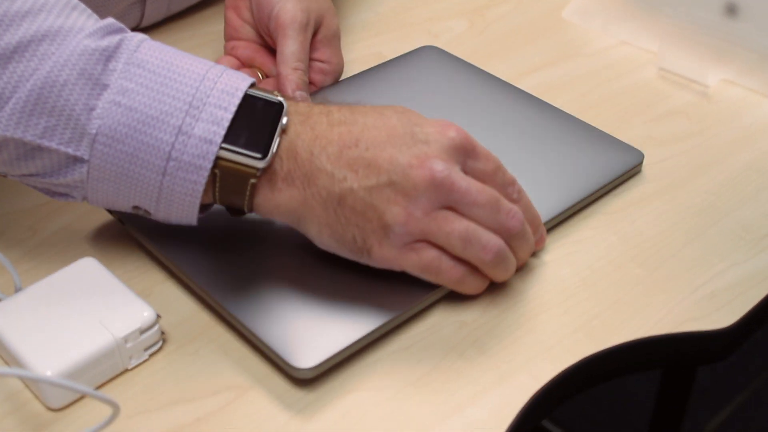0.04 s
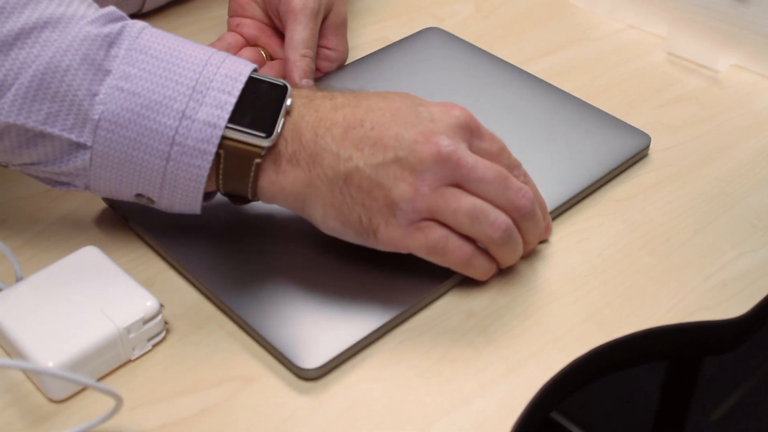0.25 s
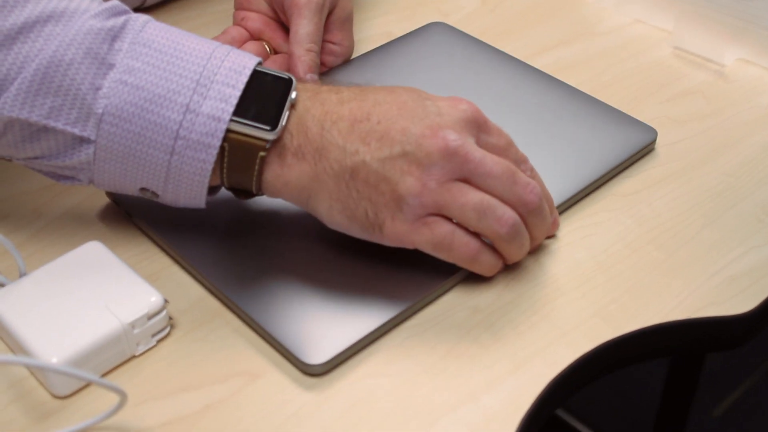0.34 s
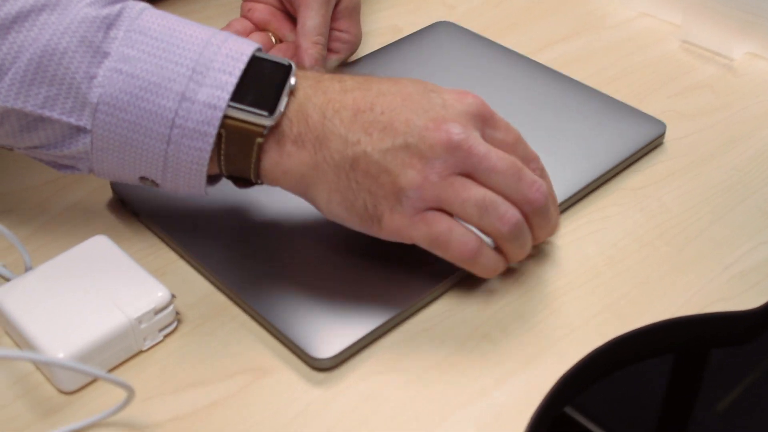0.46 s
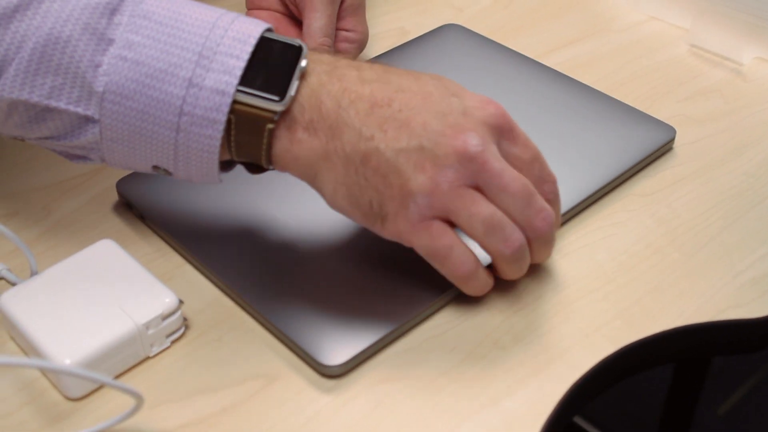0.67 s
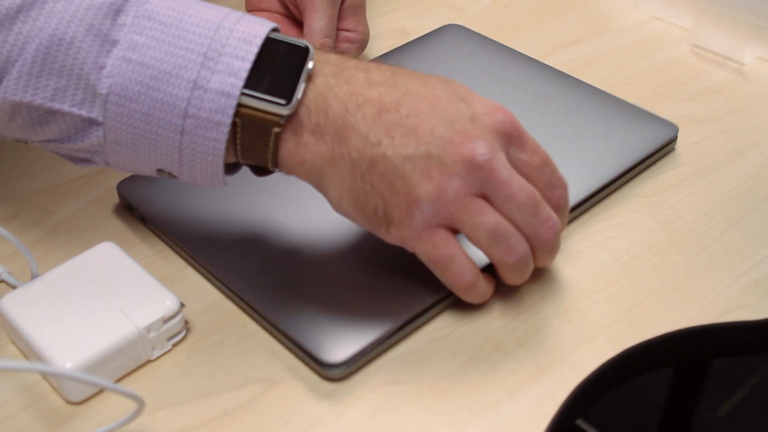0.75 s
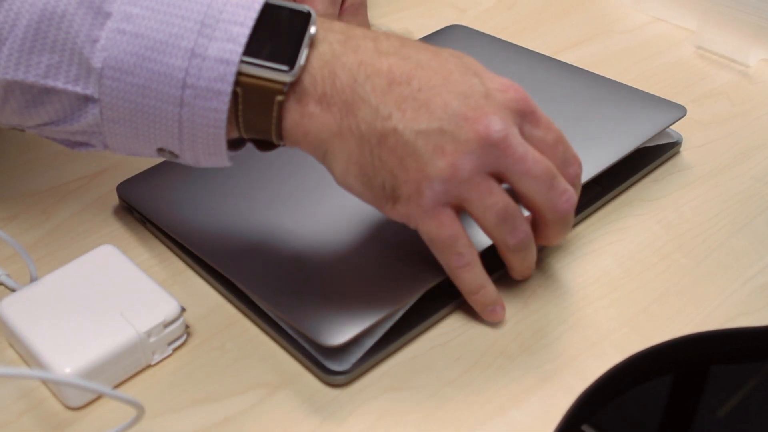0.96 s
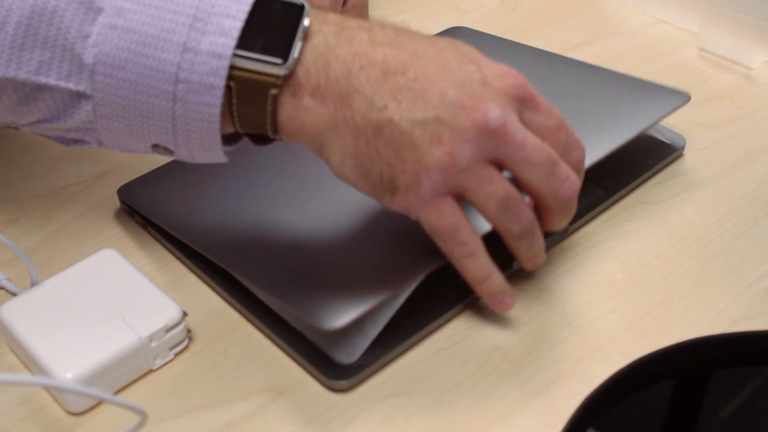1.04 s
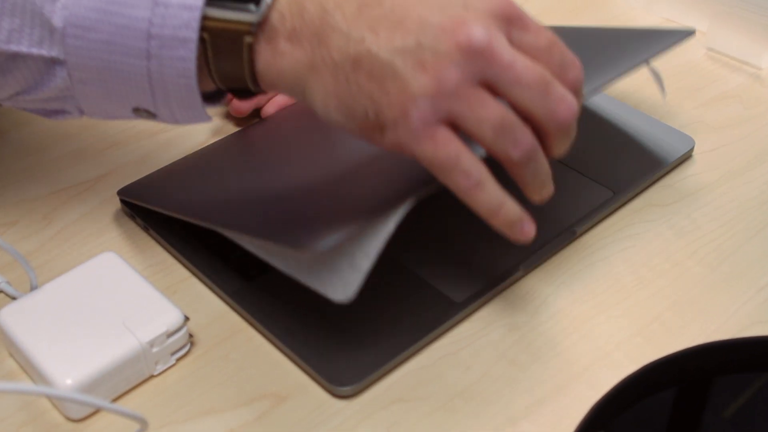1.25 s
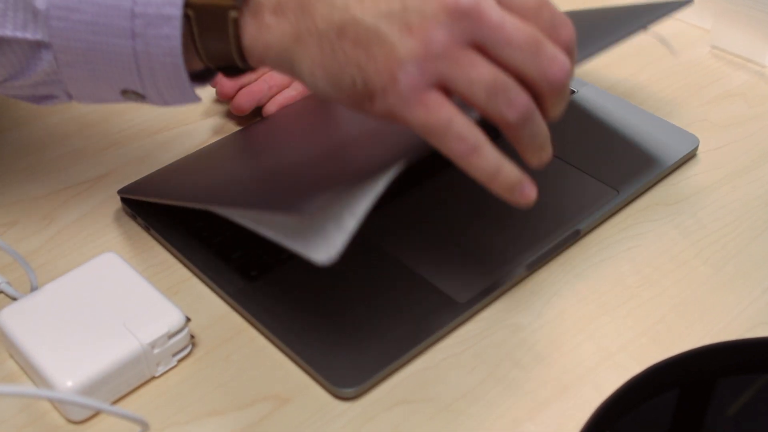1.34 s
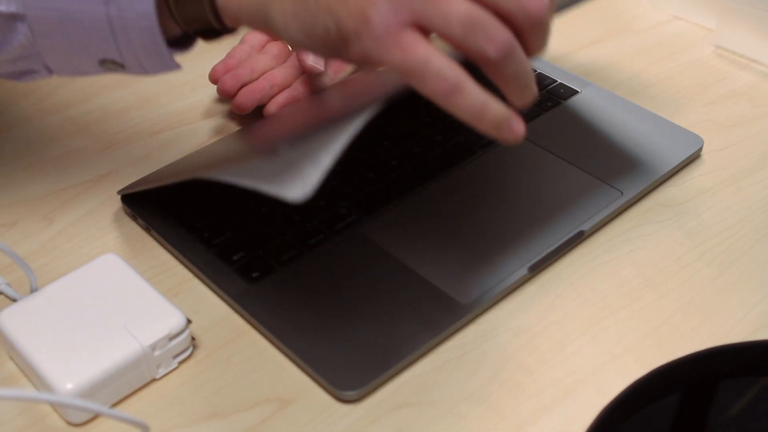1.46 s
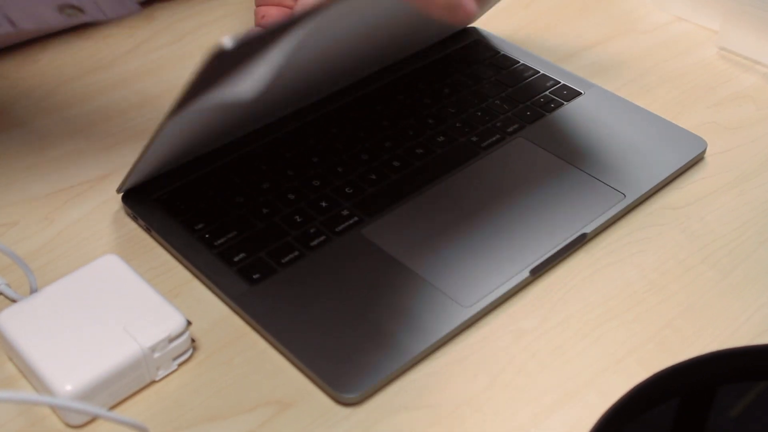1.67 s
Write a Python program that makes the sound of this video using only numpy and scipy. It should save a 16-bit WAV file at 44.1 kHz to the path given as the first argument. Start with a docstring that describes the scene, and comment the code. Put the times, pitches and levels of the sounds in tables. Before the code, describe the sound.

A metal laptop is handled on a wooden table: two finger knocks, a louder clap and thud as the lid slips shut, then a short fingernail scrape. It sounds close, in a small, quiet room with steady ventilation.

```python
"""A quiet, small room: a closed aluminium laptop is handled on a wooden table.
Fingers knock on its edge and ring the case; the lid slips and claps shut, and the table top booms.
A fingernail scrapes into the notch in tiny slips, then skin rubs faintly on the rising lid.
The contacts ring briefly in the room, over steady ventilation noise."""
import sys
import numpy as np
from scipy import signal
from scipy.fft import rfft, irfft
from scipy.io import wavfile

SR = 44100
rng = np.random.default_rng(int(sys.argv[2]) if len(sys.argv) > 2 else 0)


def put_to_file(sound):
    """Save the sound as 16-bit audio at rate SR, in the file named by the first command-line argument."""
    columns = np.atleast_2d(sound).T  # one column per channel
    safe = np.clip(columns, -1, 1)
    whole_steps = np.round(safe * 32767)
    wavfile.write(sys.argv[1], SR, whole_steps.astype(np.int16))


N = 74970
T = np.arange(N) / SR
RING_T = T[:int(.25 * SR)]


def lid():
    """Metal claps on metal, one corner first; the body thuds on the table and settles."""
    # Each row: start in seconds, gain in dB, contact low-pass in Hz.
    claps = [(0.4335, -3, 16800), (0.4378, -1.5, 3340), (0.4587, -14.5, 7860)]
    thuds = [(0.4348, -0.85, 4950), (0.4595, -11.5, 1780), (.541, -21, 347), (.572, -28, 398)]
    # Each row: frequency in Hz, spectral gain in dB.
    clap_colour = [(60, -23.5), (140, -13.5), (300, 0), (550, -7), (1100, -2.5), (1700, -10.5),
                   (2900, -7.5), (4800, -14), (6900, -11.5), (8300, -18.5), (10500, -30), (15000, -18)]
    out = np.zeros(N)
    for start_s, db, lowpass_hz in claps:
        clap = shell(clap_colour, t60_scale=1)
        out += start_at(from_db(db) * soften(clap, lowpass_hz), start_s)
    for start_s, db, lowpass_hz in thuds:
        thud = body("thud", t60_scale=.73, scatter_db=3.76)
        out += start_at(from_db(db) * soften(thud, lowpass_hz), start_s)
    return out


def taps():
    """Fingertips knock and damp the case; the nail adds a click."""
    # Each row: start in seconds, knock gain in dB, nail gain in dB, knock low-pass in Hz.
    knocks = [(.067, -2.5, -31.5, 2530), (0.2122, -1.5, -25, 4420), (.42, -7, -62, 1200),
              (0.424, -10.5, -34, 1300)]
    # Each row: frequency in Hz, spectral gain in dB.
    tap_colour = [(70, -37), (130, -35), (240, -22), (600, -15.5), (1150, -17.5), (1600, -23.5),
                  (2800, -19.5), (5000, -56), (15000, -58)]
    nail_colour = [(1000, -35), (2100, -14), (2700, -2), (3500, 7.5), (4600, -11.5), (7000, -11),
                   (9000, -20), (15000, -19)]
    out = np.zeros(N)
    for start_s, knock_db, nail_db, lowpass_hz in knocks:
        knock = body("tap", t60_scale=.54, scatter_db=.9) + shell(tap_colour, t60_scale=.7)
        click = from_db(nail_db) * shell(nail_colour, t60_scale=.7)
        out += start_at(from_db(knock_db) * soften(knock, lowpass_hz) + click, start_s)
    return out


def body(contact, t60_scale, scatter_db):
    """The laptop's main modes, struck a little differently each time."""
    # Each row: frequency in Hz, tap gain in dB, thud gain in dB, unscaled T60 in seconds.
    modes = [(113, -63, -45, 0.2), (191, -37.5, -27.5, 0.122), (276.6, -36, -14, 0.14),
             (357, -75, -17, 0.12), (473.4, -36.5, -26, 0.13), (578.5, -27, -19.5, 0.12),
             (741, -30, -23.5, 0.12), (857, -35, -24, 0.14), (956, -27.5, -23, 0.071),
             (1151, -25.5, -24.5, 0.079), (1267, -31, -23, 0.096), (1365, -36, -24, 0.053),
             (2007, -33.5, -26, 0.041), (2560, -29.5, -42, 0.019), (2880, -33.5, -29, 0.084),
             (3370, -37, -23.5, 0.012)]
    out = np.zeros(len(RING_T))
    for k, (hz, tap_db, thud_db, t60_s) in enumerate(modes):
        db = (tap_db if contact == "tap" else thud_db) + scatter_db * rng.standard_normal()
        ring = decay(RING_T, t60_scale * t60_s) * np.sin(2 * np.pi * hz * RING_T)
        out += (-1) ** k * from_db(db) * ring
    return out


def shell(colour, t60_scale):
    """The metal shell's dense upper modes crack after one contact."""
    # Each row: frequency in Hz, unscaled T60 in seconds.
    ring_times = [(100, 0.13), (1000, 0.051), (3000, 0.034), (7000, 0.028), (15000, 0.011)]
    return dying_bands(gain=lambda hz: from_db(at_hz(colour, hz)),
                       t60_s=lambda hz: t60_scale * at_hz(ring_times, hz), t=RING_T)


def fingernail():
    """A nail scrapes the rim in dense tiny slips, with a few sharp catches."""
    # Each row: centre in seconds, Gaussian sigma in seconds, gain in dB.
    scrapes = [(0.748, .003, -16.5), (.795, 0.0066, 1.35), (1.071, 0.0021, -14)]
    # Each row: start in seconds, gain in dB.
    catches = [(0.7928, 3), (.7978, 1), (0.805, -12), (0.8072, 2)]
    # Each row: frequency in Hz, spectral gain in dB.
    scrape_colour = [(300, -61), (1000, -37), (1500, -30), (2900, -29.5), (4000, -37.5), (5500, -48),
                     (9000, -48), (14500, -43.5)]
    catch_colour = [(700, -53), (2700, -26.5), (5500, -46), (14000, -32)]
    slips_per_s, spread_db = 7700, 1.5
    slips = (rng.random(N) < slips_per_s / SR) * rng.choice([-1, 1], N)
    slips = slips * from_db(spread_db * rng.standard_normal(N))
    pressure = sum(from_db(db) * swell(centre_s, sigma_s) for centre_s, sigma_s, db in scrapes)
    clicks = sum(start_at(from_db(db) * shell(catch_colour, t60_scale=.16), s) for s, db in catches)
    return tint(slips / slips.std() * pressure, scrape_colour) + clicks


def handling():
    """All contacts as the case radiates them in one direction."""
    return taps() + lid() + fingernail()


def table_top():
    """The table top's lowest mode swells and dies after a blow."""
    # Each row: start in seconds, gain in dB.
    sways = [(.075, -49), (0.226, -44), (0.486, -44)]
    mode_hz, rise_s = 62, .019
    sway = np.sin(2 * np.pi * mode_hz * T) * (1 - np.exp(-T / rise_s)) * decay(T, t60_s=.26)
    return sum(start_at(from_db(db) * sway, start_s) for start_s, db in sways)


def rub():
    """Skin slides on the metal while the lid swings up."""
    # Each row: frequency in Hz, relative spectral density in dB.
    rub_colour = [(900, -21), (1700, -10), (2500, 14), (3100, -30), (8000, -24)]
    friction = tint(rng.standard_normal(N), rub_colour)
    return friction / friction.std() * from_db(-63.5) * swell(centre_s=1.52, sigma_s=.17)


def room(x):
    """A diffuse tail that builds quickly and lasts longest in the bass."""
    # Each row: frequency in Hz, tail gain in dB, T60 in seconds.
    reverb = [(70, -11.5, 0.91), (186, -2, 0.42), (322, -7.5, 0.29), (700, -7.5, 0.26), (1270, -7.5, .26),
              (2920, -11.5, .26), (5900, -7.5, 0.24), (8400, -15, 0.23), (14000, -9.5, 0.2)]
    delay_s, build_s = .008, .00075
    t = T[:int(.6 * SR)]
    t60_s = lambda hz: at_hz(reverb, hz, column=2)
    # The root keeps tail energy independent of T60.
    gain = lambda hz: from_db(at_hz(reverb, hz)) * np.sqrt(2 * np.log(1000) / (t60_s(hz) * SR))
    tail = dying_bands(gain, t60_s, t) * (1 - np.exp(-t / build_s))
    return signal.fftconvolve(x, start_at(tail, delay_s))[:N]


def reflections(directions):
    """Each direction carries a slightly different crack to the walls."""
    return sum(room(handling()) for _ in range(directions)) / np.sqrt(directions)


def ventilation():
    """Steady air noise with a faint hiss on top."""
    # Each row: frequency in Hz, relative spectral density in dB.
    air_colour = [(25, 0), (45, -16.5), (78, -17), (112, -2.5), (160, -8), (235, -2), (275, -14),
                  (335, -0.5), (385, -10), (455, -1.5), (545, -6), (940, -6.5), (1300, -11), (1900, -17),
                  (2500, -20), (3200, -23), (6000, -28), (11000, -31), (16000, -31)]
    # Each row: time in seconds, RMS level in dB.
    air_level = [(0, -49), (.35, -47.5), (.75, -49.5), (1.1, -49.5), (1.4, -49), (1.7, -49)]
    air = tint(rng.standard_normal(N), air_colour)
    return air / air.std() * from_db(np.interp(T, *np.transpose(air_level)))


def dying_bands(gain, t60_s, t):
    """Countless close modes: bands of noise, each dying at its own rate."""
    edges_hz = [45, 110, 210, *np.geomspace(340, 16500, 18)]
    out = np.zeros(len(t))
    for low_hz, high_hz in zip(edges_hz, edges_hz[1:]):
        centre_hz = np.sqrt(low_hz * high_hz)
        band = signal.butter(2, [low_hz, high_hz], "band", fs=SR, output="sos")
        fade = decay(t, max(t60_s(centre_hz), .002)) + 1e-18
        out += gain(centre_hz) * signal.sosfilt(band, rng.choice([-1., 1.], len(t)) * fade)
    return out


def soften(x, lowpass_hz):
    """A softer contact loses its treble."""
    return signal.sosfilt(signal.butter(2, lowpass_hz, fs=SR, output="sos"), x + 1e-18)


def tint(x, colour):
    """Filter by a curve of (Hz, dB) points."""
    hz = np.maximum(np.fft.rfftfreq(2 * N, 1 / SR), 1)
    return irfft(rfft(x, 2 * N) * from_db(at_hz(colour, hz)))[:N]


def at_hz(points, hz, column=1):
    """Interpolate a column over log frequency."""
    rows = np.array(points)
    return np.interp(np.log(hz), np.log(rows[:, 0]), rows[:, column])


def decay(t, t60_s):
    """Exponential fall, 60 dB in t60_s."""
    return np.exp(-np.log(1000) * t / t60_s)


def swell(centre_s, sigma_s):
    """Gaussian envelope."""
    return np.exp(-.5 * ((T - centre_s) / sigma_s) ** 2)


def start_at(x, start_s):
    """Delay, then pad or trim to N samples."""
    return np.concatenate([np.zeros(int(start_s * SR)), x, np.zeros(N)])[:N]


def from_db(db):
    """Decibels to gain."""
    return 10 ** (np.asarray(db) / 20)


def scene():
    """The handling sounds in their room, mono."""
    return (ventilation() + rub() + handling() + reflections(directions=3) + table_top())[None]


def record(dry):
    """The microphone sheds the deepest bass; the top is cut steeply."""
    highpass_hz, lowpass_hz = 52, 15900
    lean = signal.sosfilt(signal.butter(2, highpass_hz, "high", fs=SR, output="sos"), dry)
    return signal.sosfilt(signal.ellip(10, .1, 80, lowpass_hz, fs=SR, output="sos"), lean)


dry = scene()
out = record(dry)
put_to_file(out)
```